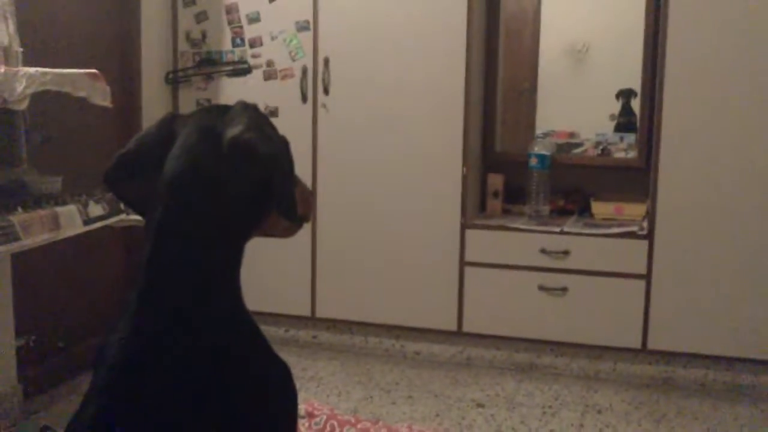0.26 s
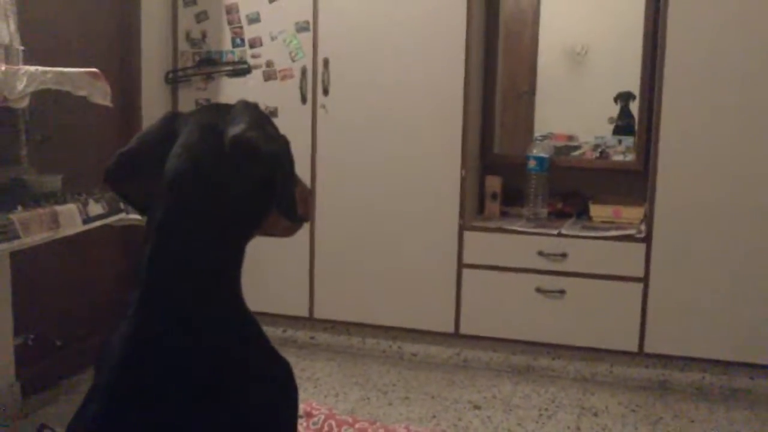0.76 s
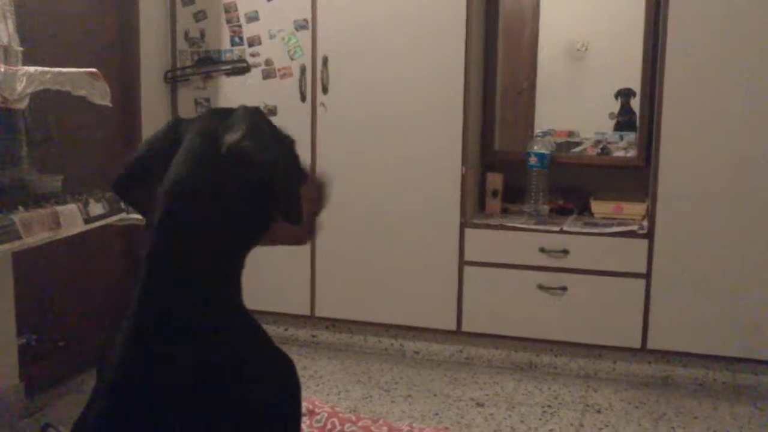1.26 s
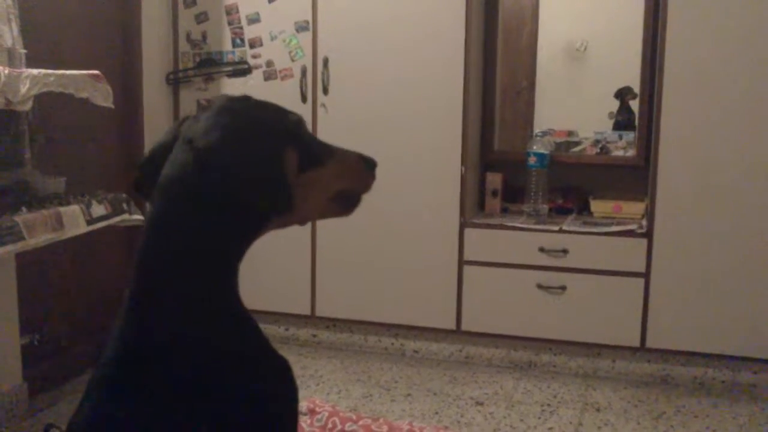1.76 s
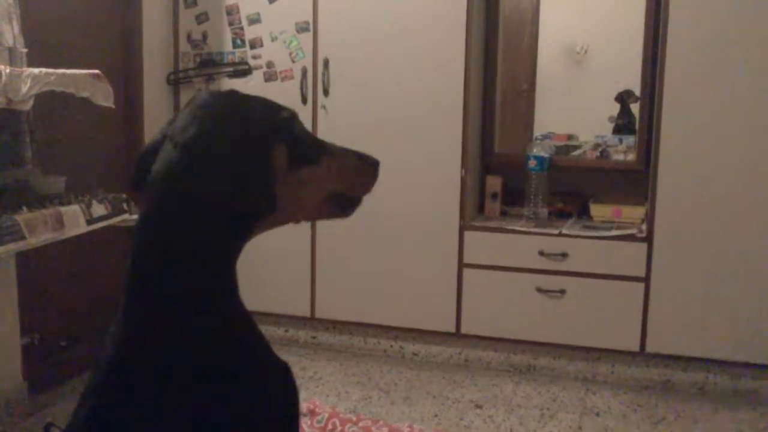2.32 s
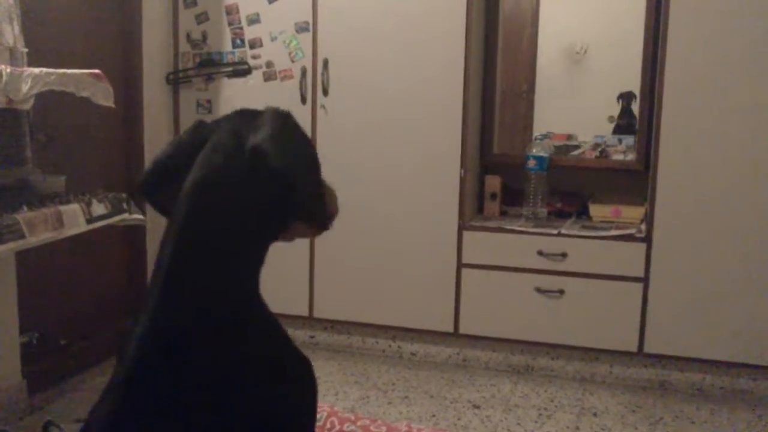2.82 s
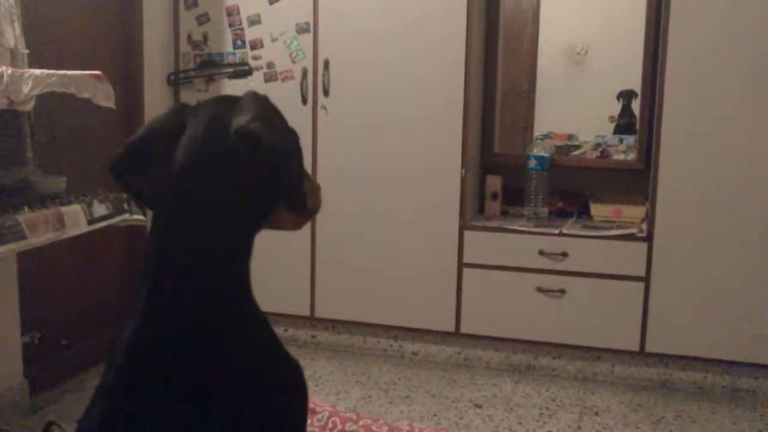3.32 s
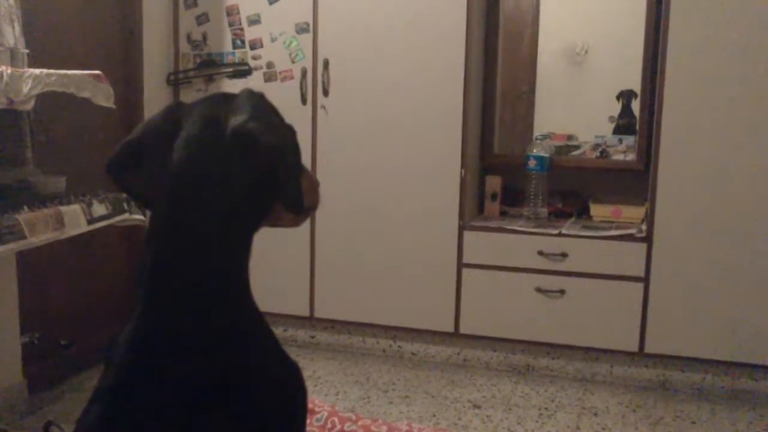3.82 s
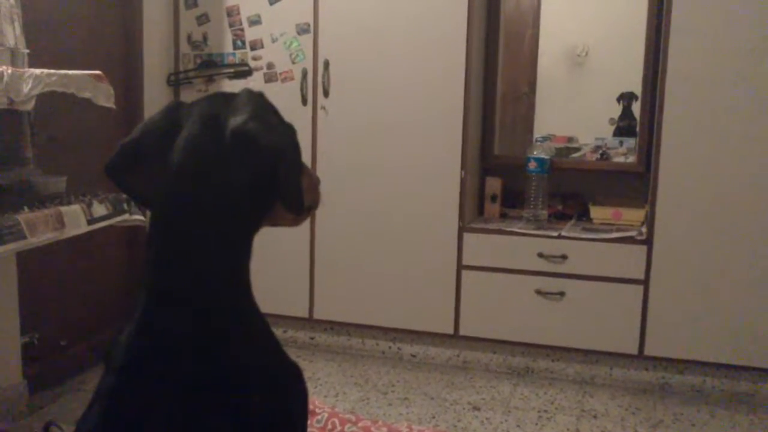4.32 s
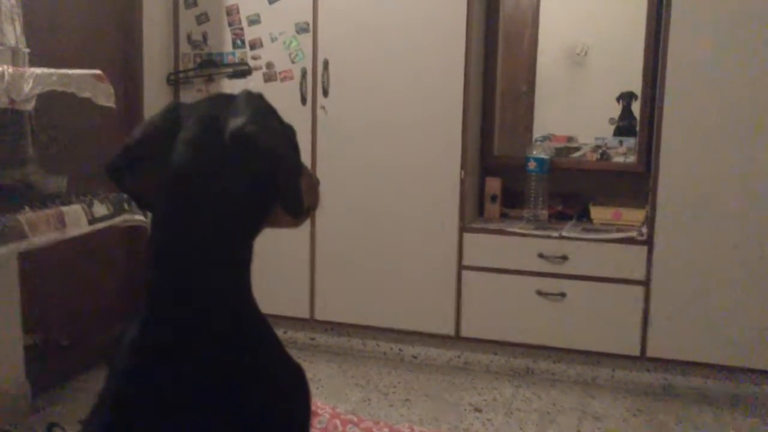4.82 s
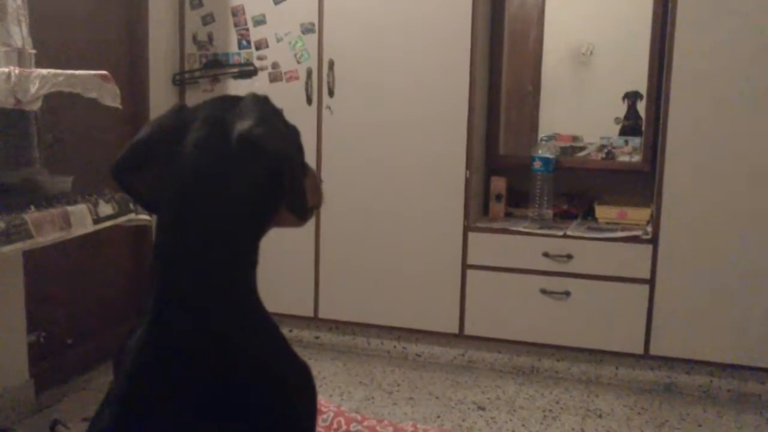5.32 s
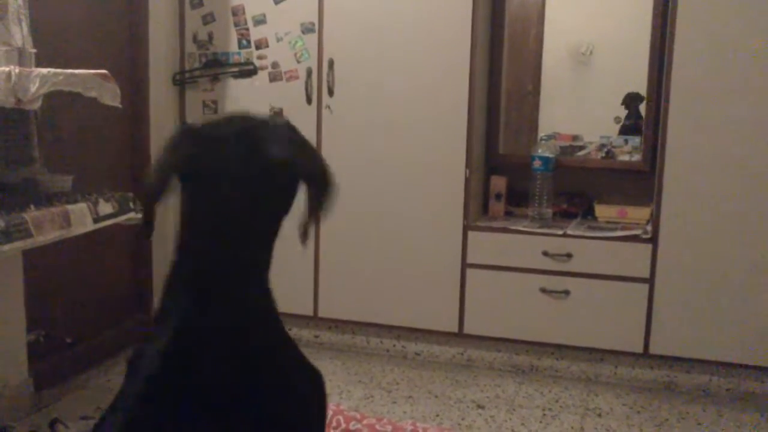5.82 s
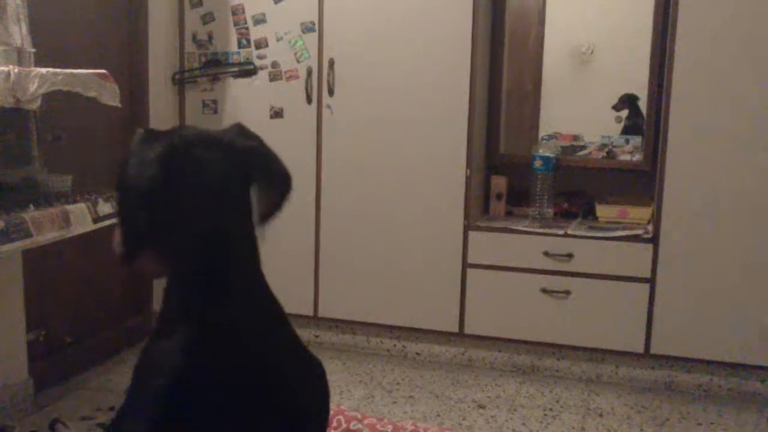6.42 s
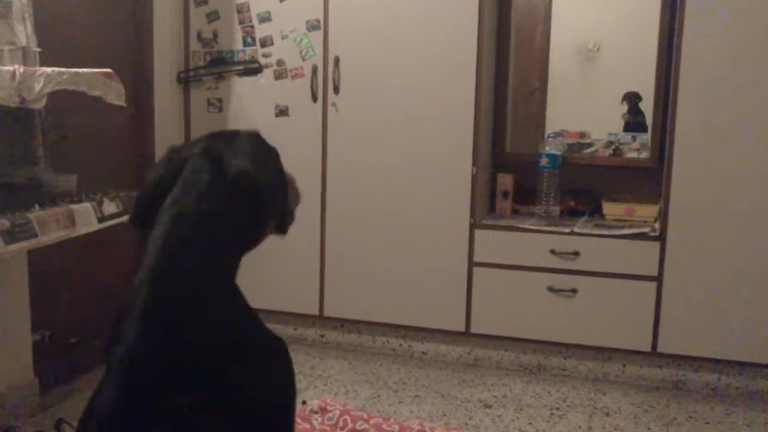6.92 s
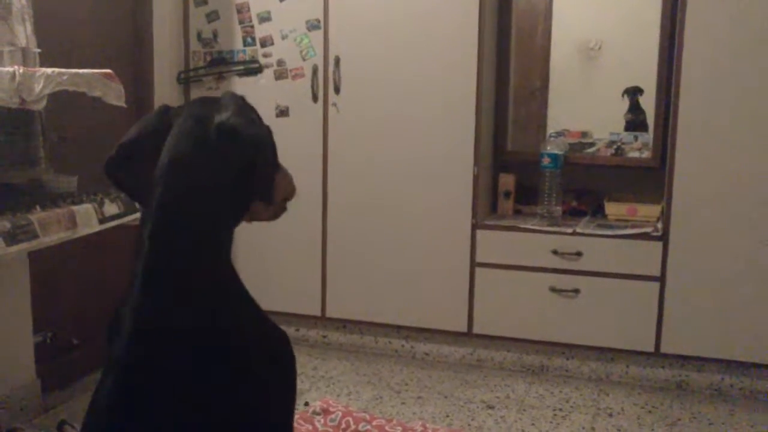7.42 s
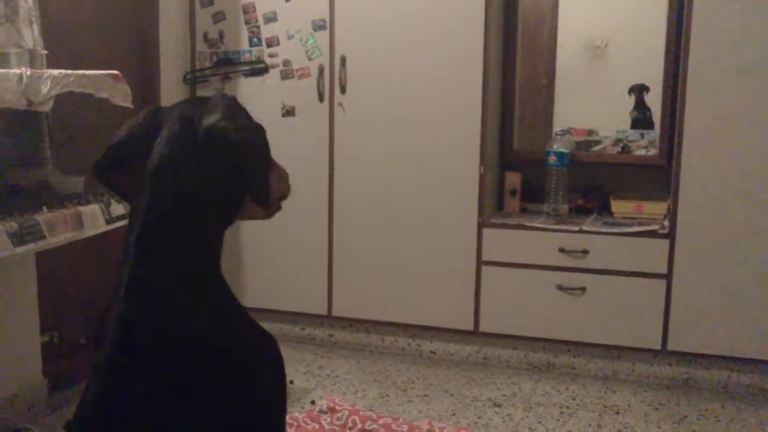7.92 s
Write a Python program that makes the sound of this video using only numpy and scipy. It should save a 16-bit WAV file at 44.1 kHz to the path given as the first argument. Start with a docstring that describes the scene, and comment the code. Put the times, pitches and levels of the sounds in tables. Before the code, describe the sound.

Indoors, a big dog alternates faint wavering growls with four loud, abrupt barks and one muffled woof, over low rumble and soft hiss.

```python
"""A large dog in a hard-floored bedroom, its back to a stereo pair, over shaped noise: rumble and microphone hiss.
It growls low, a wavering tone with uneven slaps and noisy rasp ringing in the throat, and breaks into a bark:
fold pulses and noise through a moving mouth resonance, plus breath. A muffled woof ends in a huff of air and a
faint sine whistle in the nose. A second growl leads to two barks, the latter sinking into a third growl; a
fourth bark is cut off by the end. Decaying reflections ring for about half a second, longer in the bass."""
import sys
import numpy as np
from scipy import signal
from scipy.fft import rfft, irfft, next_fast_len
from scipy.io import wavfile
from scipy.ndimage import uniform_filter1d, minimum_filter1d

SR = 44100
rng = np.random.default_rng(int(sys.argv[2]) if len(sys.argv) > 2 else 0)


def unload_audio(sound):
    """Save the sound as a 16-bit wav file, at the path given as the first command line argument."""
    columns = np.transpose(np.atleast_2d(sound))
    # keep every value between -1 and 1, then stretch to whole-number steps
    steps = np.round(np.clip(columns, -1, 1) * 32767)
    wavfile.write(sys.argv[1], SR, steps.astype(np.int16))


N = 359856  # samples

# Background noise spectrum, relative: f/Hz, density/dB per Hz
FLOOR_SPECTRUM = [(11, -17.5), (18, 5), (22, -15.5), (53, -19.5), (80, -22), (166, -33), (256, -38),
                  (439, -41), (476, -48), (531, -42.5), (677, -45), (775, -45.5), (1200, -49),
                  (11600, -62.5), (15100, -93), (22000, -120)]
# Left-right likeness of the background: f/Hz, likeness/0-1
FLOOR_LIKENESS = [(40, 1), (130, 0.59), (270, 0.75), (1000, .02)]
FLOOR_DB = -58  # rms level

# The three growls, one list each: t/s, pitch/Hz, tone level/dB, lip opening as upper rattle level/dB
GROWL_CURVES = [
    [(.25, 116.4, -70, -99.5), (.45, 127.6, -64.5, -86), (.614, 93.6, -61, -84), (.9, 101.3, -56.5, -87),
     (1.06, 105.9, -50, -86), (1.12, 108.3, -55, -83), (1.19, 104.9, -48.5, -80),
     (1.235, 112.9, -48, -57.5), (1.29, 137.6, -44.5, -54.5), (1.34, 198, -47, -50)],
    [(4.74, 119.9, -67, -85), (4.98, 108.5, -52.5, -79), (5.12, 116, -52.5, -84), (5.22, 115.2, -50.5, -80),
     (5.42, 111.5, -51.5, -79), (5.5, 110.9, -56, -80), (5.74, 109.2, -55.5, -85),
     (5.8, 112.7, -47.5, -79.5), (5.83, 120, -44, -75), (5.875, 190, -48, -60.5)],
    [(6.97, 164.4, -43.5, -45), (7.03, 142.5, -42, -31), (7.11, 119, -41.5, -54.5),
     (7.2, 109, -41.5, -47.5), (7.28, 113.8, -40, -54), (7.43, 105.6, -43, -55.5),
     (7.6, 98.95, -50.5, -67.5), (7.67, 107.5, -58.5, -75), (7.75, 115, -55, -81),
     (8.02, 108.2, -53.5, -75), (8.07, 109.8, -45, -58.5), (8.12, 180.1, -47, -52.5)],
]
# Throat resonances of the rattle: f/Hz, width/Hz, relative level/dB
THROAT_MODES = [(162.04, 90, 3.5), (275, 64, 0), (411, 54, -3)]
# Lip resonances, the upper rattle: f/Hz, width/Hz, relative level/dB
LIP_MODES = [(790, 120, -1), (1050, 81, -9.5)]
# Rasp resonances: f/Hz at a lip level of -60 dB, width/Hz, relative level/dB, shift/Hz per dB of lip opening
RASP_MODES = [(2600, 400, -7, -20), (3950, 650, 0, 22), (5200, 600, -12, 0)]
RATTLE_DB, RATTLE_FOLLOWS = -56, 0.78  # throat rattle at a tone of -51 dB; dB gained per dB of tone
RASP_DB, RASP_TOP_DB = -16, -68  # rasp relative to the lips; its ceiling
WAVER_DB = 3.5  # rms swing of the tone level
JAW_LAG_S = .15

# The four barks: t/s where the voice breaks upward, level/dB, held note/Hz, slide/Hz per s, run-up length/share,
# run-up level/dB, run-up mouth/share, held mouth/share, roughness/share, breath level/dB, tail level/dB
BARK_EVENTS = [(1.357, -12, 716.8, -150, 1.15, 0, .95, 1.04, 1.05, -36, -1),
               (5.892, -10.5, 758.9, -100, .98, 0, 1.05, 1.052, .95, -36, -3.5),
               (6.847, -10.5, 740.3, 699, .8, -3.5, 0.57549, 0.87, 1.1, -37.5, 3),
               (8.145, -12, 771.7, 98.5, 1.08, 3.5, 0.87, 1.08, 1.09, -33, -1)]
# Stages shared by every bark: t/s from the break, relative effort/dB, pitch/share of held note,
# roughness/0-1, mouth resonance/Hz before shares, relative breath/dB
BARK_SHAPE = [(-.064, -38.5, .25, .5, 1496, -47.5), (-.034, -9, .46, .58, 3010, -23.5),
              (-.004, -0.5, .62, .66, 2550, -6), (0, -0.5, .93, .48, 2394, -7),
              (.012, 0.5, .99, .38, 2300, -3), (0.027, -1, 0.98, .34, 2100, 0),
              (.048, -3, 1, .34, 1500, -5), (.072, -7.5, .88, .44, 1290, -18),
              (.08, -17.5, .37, .3, 569.2, -7.5), (.118, -20.5, .29, 0.3, 427, -29),
              (0.149, -25.5, .22, 0.2, 336.1, -47.5)]
# Fixed tone colour of the bark: f/Hz, gain/dB
BARK_SPECTRUM = [(88, -36.5), (200, -25.5), (430, -18.5), (720, 0.5), (1060, -14.5), (1460, -14.5),
                 (2290, -18.5), (3300, -21), (4300, -32.5), (5500, -73), (7000, -100)]
# Breath spectrum of the bark, relative: f/Hz, density/dB per Hz
BARK_HISS = [(3240, -106), (5500, -82), (5910, -73.5), (6060, -39), (6350, -19.5), (7590, 4),
             (10200, -12.5), (11000, -7.5), (11600, -22.5), (15100, -53), (22000, -120)]

# The woof: t/s, effort/dB, pitch/Hz, roughness/0-1, mouth resonance/Hz, breath level/dB
WOOF_CURVE = [(2.745, -40, 105, 0.01, 99, -85.5), (2.775, -42.5, 149.8, .12, 140, -85),
              (2.79, -48.5, 252.5, 0.33, 360, -85), (2.8, -35.5, 393.9, 0.44, 786.7, -64),
              (2.825, -29.5, 489.7, 0.7, 990, -66.5), (2.86, -43, 358.8, 0.72, 836.3, -53),
              (2.95, -64, 253, 0.78, 802, -52.5), (3.03, -71, 249, 0.8, 800, -78)]
# Fixed tone colour of the woof: f/Hz, gain/dB
WOOF_SPECTRUM = [(60, -38), (130, -24.5), (440, -10), (700, -8), (950, -15), (1250, -11.5), (1800, -13.5),
                 (2300, -31), (4000, -29), (6000, -74)]
# Breath spectrum of the woof, relative: f/Hz, density/dB per Hz
WOOF_HISS = [(1200, -11.5), (2000, -6), (3300, -0.5), (5770, -4), (7310, 6), (9180, -5), (11600, -6.5),
             (15700, -16.5)]

WHISTLE_S, WHISTLE_LENGTH_S = 3.09, .68
WHISTLE_HZ, WHISTLE_DB, WHISTLE_FADE_DB = 3075, -87, -12  # centre pitch, opening rms level, change by the end

# Reverberation time by band: f/Hz, t60/s
ROOM_DECAY = [(100, 0.91), (530, 0.47), (1400, 0.48), (3700, 0.52), (9700, 0.36)]
# Left-right likeness of the reverberation: f/Hz, likeness/0-1
ROOM_LIKENESS = [(100, 0.29), (300, 0.92), (700, 0.7), (1500, .3), (4000, .05)]
# Colour difference of the microphone openings: f/Hz, left over right/dB
PORT_COLOUR = [(60, 2), (150, 2.5), (400, 1.93), (1100, 2.5), (3500, 2), (6250, -9.5), (9500, -11),
               (12500, 9.5)]
LIMIT_DB, EDGE_HZ = -5, 15800  # limiter threshold, upper band edge
OFFSET = -.0102  # right channel, share of full scale


def gain_of(db):
    """Turns dB into an amplitude factor."""
    return 10 ** (np.asarray(db) / 20)


def evened(x):
    """Scales to rms 1."""
    return x / np.sqrt(np.mean(x ** 2) + 1e-20)


def read(points, hz):
    """Reads a table along a log-frequency axis."""
    f, value = np.transpose(points)
    return np.interp(np.log(hz + 1), np.log(f + 1), value)


def wander(count, size):
    """Smooth random drift of rms 1: noise averaged twice over `size` points."""
    once = uniform_filter1d(rng.standard_normal(count), size=size)
    return evened(uniform_filter1d(once, size=size))


def floor():
    """Background noise: rumble largely shared by both microphones, hiss of their own."""
    frames, hz = N // 512 + 5, np.fft.rfftfreq(2048, 1 / SR)
    a, b, c, d = rng.standard_normal((frames, len(hz), 4)).T
    left, other = a + 1j * b, c + 1j * d
    same = np.clip(read(FLOOR_LIKENESS, hz), -1, 1)[:, None]
    right = same * left + np.sqrt(1 - same ** 2) * other
    pair = np.array([left, right]) * gain_of(read(FLOOR_SPECTRUM, hz))[:, None]
    # the rumble swells and sinks, the hiss is even
    pair *= gain_of(1.8 * wander(frames, size=12) * (hz < 120)[:, None])
    noise = signal.istft(pair, nperseg=2048, noverlap=1536)[1][:, :N]
    return gain_of(FLOOR_DB) * evened(noise)


def unfold(rows):
    """Joins curve rows by straight lines, one value a sample."""
    s, *columns = np.transpose(rows)
    t = np.arange(s[0], s[-1], 1 / SR)
    return [np.interp(t, s, c) for c in columns]


def resonate(x, hz, width):
    """Moving resonance of gain 1: shifts the curve hz down to zero, smooths, shifts back."""
    turn = np.exp(2j * np.pi * np.cumsum(hz * np.ones(len(x))) / SR)
    r = np.exp(-np.pi * width / SR)
    smoothed = signal.lfilter([1 - r], [1, -r], x / turn)
    return 2 * (turn * smoothed).real


def tract(x, modes):
    """Steep resonances side by side, each passed twice; rms 1."""
    rung = [gain_of(db) * evened(resonate(resonate(x, hz, w), hz, w)) for hz, w, db in modes]
    return evened(sum(rung))


def growl(rows):
    """A wavering chest tone; every second beat of the folds slaps unevenly into throat and lips."""
    hz, tone_db, lips_db = unfold(rows)
    count = len(hz)
    rattle_db = RATTLE_DB + RATTLE_FOLLOWS * (tone_db + 51)
    rasp_db = np.minimum(lips_db + RASP_DB, RASP_TOP_DB)
    turns = np.cumsum(hz * (1 + .045 * wander(count, size=500))) / SR
    tone = np.sin(2 * np.pi * turns) + gain_of(-18.5) * np.sin(4 * np.pi * turns)
    tone = np.sqrt(2) * tone * gain_of(WAVER_DB * wander(count, size=800))
    slap_turns = turns / 2 + 0.18 * wander(count, size=400)
    struck = np.diff(np.floor(slap_turns), prepend=0) > 0
    slaps = struck * gain_of(2.2 * rng.standard_normal(count))
    # flesh meets softly, over half a millisecond, in a steady stream of air
    drive = uniform_filter1d(evened(slaps) + 1.1 * rng.standard_normal(count), size=21)
    puffs = (.9 + np.exp(-(turns % 1) / .3)) * rng.standard_normal(count)
    sound = gain_of(tone_db) * tone + gain_of(rattle_db) * tract(drive, THROAT_MODES)
    sound += gain_of(lips_db) * tract(drive, LIP_MODES)
    # the rasp resonances draw together as the lips close
    opening = np.clip(lips_db, -75, -48) + 60
    lag = 2 * round(JAW_LAG_S * SR) + 1  # the jaw follows the lips late
    opening = uniform_filter1d(opening, size=lag, origin=lag // 2, mode="nearest")
    rasp_modes = [(f + move * opening, w, db) for f, w, db, move in RASP_MODES]
    sound += gain_of(rasp_db) * tract(puffs, rasp_modes)
    return rows[0][0], sound * signal.windows.tukey(count, .07)


def bark_curve(break_s, level_db, note_hz, slide, runup_length, runup_db, runup_mouth, held_mouth,
               rough_share, breath_db, tail_db):
    """Fits the shared stages to one bark: run-up, held note, falling tail."""
    s, effort, share, rough, mouth_hz, breath = np.transpose(BARK_SHAPE)
    before, tail = s < 0, (s > 0) & (share < .5)
    t = break_s + s * np.where(before, runup_length, 1)
    effort_db = level_db + effort + runup_db * before + tail_db * tail
    hz = share * (note_hz + slide * np.clip(s - .026, 0, .03))
    mouth_hz = mouth_hz * np.where(before, runup_mouth, np.where(tail, 1, held_mouth))
    return np.transpose([t, effort_db, hz, rough * rough_share, mouth_hz, breath_db + breath])


def coloured(x, spectrum):
    """Filters a sound by a fixed gain curve."""
    size = next_fast_len(len(x) + 4096)
    gain = gain_of(read(spectrum, np.fft.rfftfreq(size, 1 / SR)))
    return irfft(rfft(x, size) * gain, size)[:len(x)]


def bark_or_woof(rows, colour, breath, mouth_db, mouth_width):
    """Fold pulses and puffs of noise pass a moving mouth resonance; breath hisses past the teeth."""
    effort_db, hz, rough, mouth_hz, breath_db = unfold(rows)
    count, rough = len(hz), np.clip(rough, 0, 1)
    turns = np.cumsum(hz * (1 + .22 * rough ** 2 * wander(count, size=40))) / SR
    # partials well above the mouth resonance are shut in
    folds = sum(np.cos(2 * np.pi * k * turns) / (1 + (k * hz / (1.6 * mouth_hz)) ** 4) for k in range(1, 24))
    folds = np.sqrt(hz) * folds  # power shared among the partials: a lower pitch is not louder
    gate = 1.2 + np.exp(-(turns % 1) / 0.9)
    puffs = evened(gate * rng.standard_normal(count))
    drive = (1 - rough) * evened(folds) + rough * puffs
    mouth = resonate(resonate(drive, mouth_hz, mouth_width), mouth_hz, mouth_width)
    drive = drive + gain_of(mouth_db) * mouth
    hiss = evened(coloured(gate * rng.standard_normal(count), breath))
    voice = gain_of(effort_db) * evened(coloured(drive, colour)) + gain_of(breath_db) * hiss
    return rows[0][0], voice * signal.windows.tukey(count, .12)


def nose_whistle():
    """A faint sine whistle in the nose after the woof, slightly unsteady, fading."""
    t = np.arange(0, WHISTLE_LENGTH_S, 1 / SR)
    hz = WHISTLE_HZ + 25 * wander(len(t), size=600)
    tone = np.sin(2 * np.pi * np.cumsum(hz) / SR)
    level = gain_of(WHISTLE_DB + WHISTLE_FADE_DB * (t / WHISTLE_LENGTH_S) ** 3)
    return WHISTLE_S, np.sqrt(2) * level * tone * signal.windows.tukey(len(t), .1)


def add(mix, s, sound):
    """Mixes a sound in at s seconds, cut at the end of the mix."""
    part = mix[round(s * SR):][:len(sound)]
    part += sound[:len(part)]


def room(x, wet_db):
    """Direct sound, then sparse reflections that die by band and are most alike left and right in the low mids."""
    taps = np.zeros((2, SR))
    starts = np.arange(200, SR - 20, 20)
    at = starts + rng.integers(0, 20, (2, len(starts)))
    np.put_along_axis(taps, at, rng.choice([-1., 1.], at.shape), 1)
    hz, t, z = signal.stft(taps, SR, nperseg=512)
    same = np.clip(read(ROOM_LIKENESS, hz), 0, 1)[:, None]
    pair = np.array([z[0], same * z[0] + np.sqrt(1 - same ** 2) * z[1]])
    decay = gain_of(-60 * t / read(ROOM_DECAY, hz)[:, None])
    tail = signal.istft(pair * decay, SR, nperseg=512)[1]
    tail = tail / np.linalg.norm(tail[0])
    return x + gain_of(wet_db) * signal.fftconvolve(x[None], tail, axes=1)[:, :N]


def ports(pair):
    """The two microphone openings hear the dog with unlike colour, half the difference on each side."""
    return np.array([coloured(x, [(f, side * db / 2) for f, db in PORT_COLOUR])
                     for x, side in zip(pair, (1, -1))])


def scene():
    """The dog in the room, over the floor of noise."""
    loud, low = np.zeros(N), np.zeros(N)
    for row in BARK_EVENTS:
        add(loud, *bark_or_woof(bark_curve(*row), BARK_SPECTRUM, BARK_HISS, mouth_db=9, mouth_width=550))
    add(loud, *bark_or_woof(WOOF_CURVE, WOOF_SPECTRUM, WOOF_HISS, mouth_db=0, mouth_width=720))
    add(loud, *nose_whistle())
    for rows in GROWL_CURVES:
        add(low, *growl(rows))
    # barks are thrown away from the microphones and come back wet; the growl spreads all round
    dog = room(loud, wet_db=0.0) + room(low, wet_db=-6.5)
    return ports(dog) + floor()


def record(dry):
    """A quick limiter holds the peaks down; then a band limit and a steady offset on the right channel."""
    crest = -minimum_filter1d(-abs(dry).max(0), size=401)
    over_db = np.maximum(20 * np.log10(crest + 1e-9) - LIMIT_DB, 0)
    held = dry / gain_of(.75 * uniform_filter1d(over_db, size=401))  # takes off three quarters of the excess
    lowpass = signal.firwin(511, EDGE_HZ, window=("kaiser", 9), fs=SR)
    band = signal.oaconvolve(held, lowpass[None], "same")
    return band + np.array([[0], [OFFSET]])


dry = scene()
out = record(dry)
unload_audio(out)
```